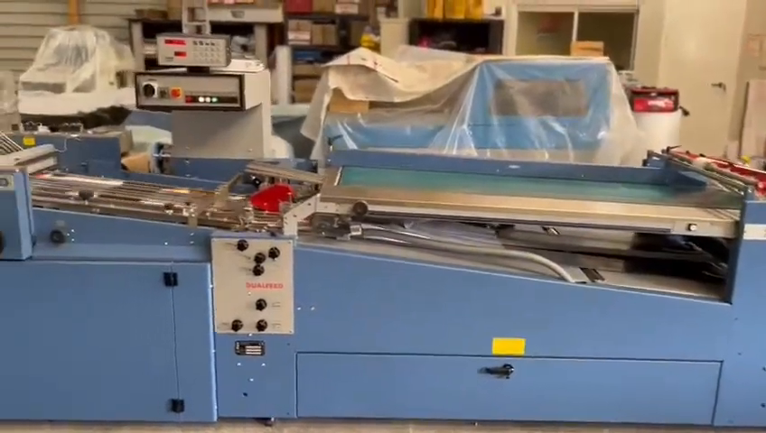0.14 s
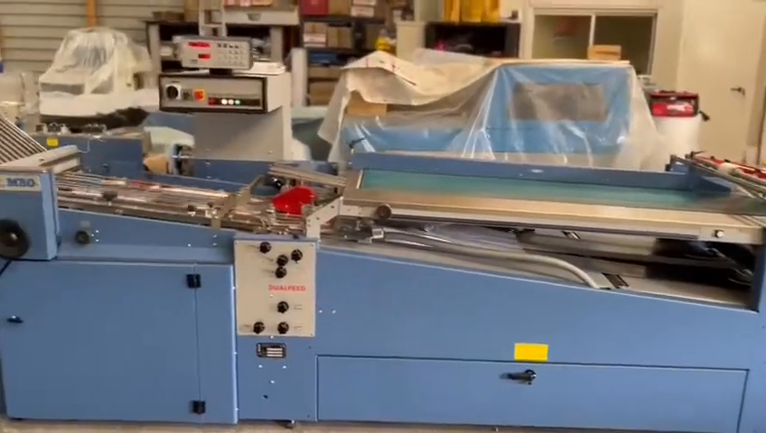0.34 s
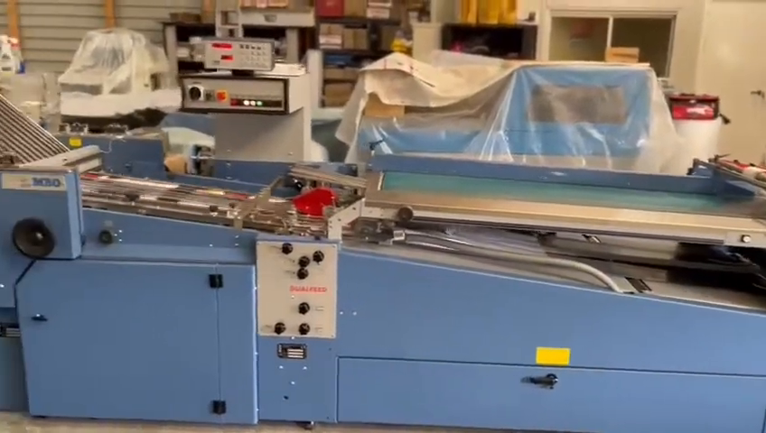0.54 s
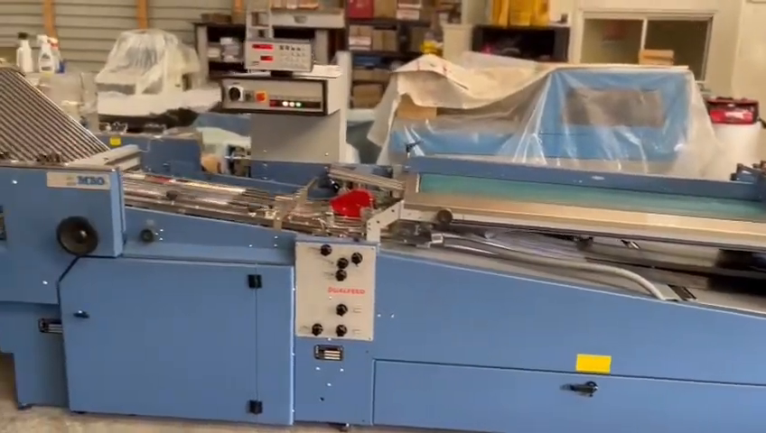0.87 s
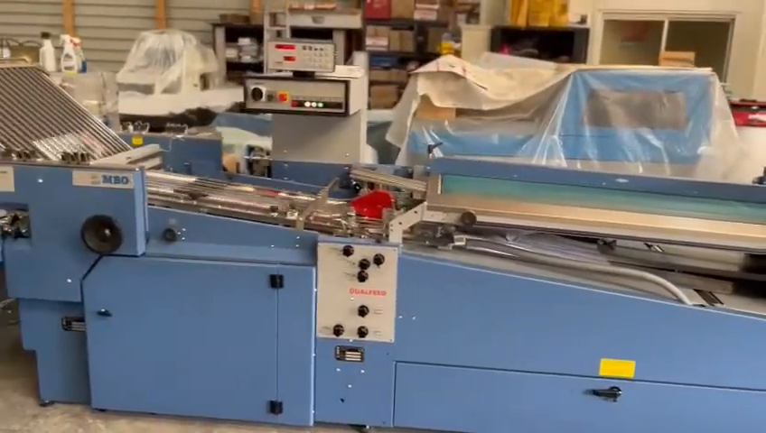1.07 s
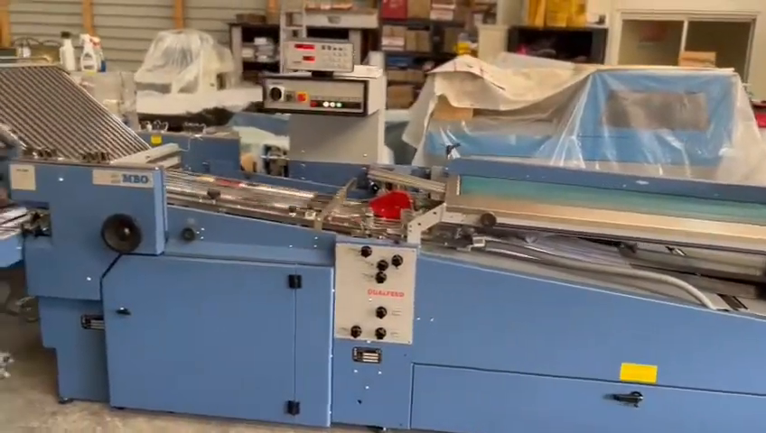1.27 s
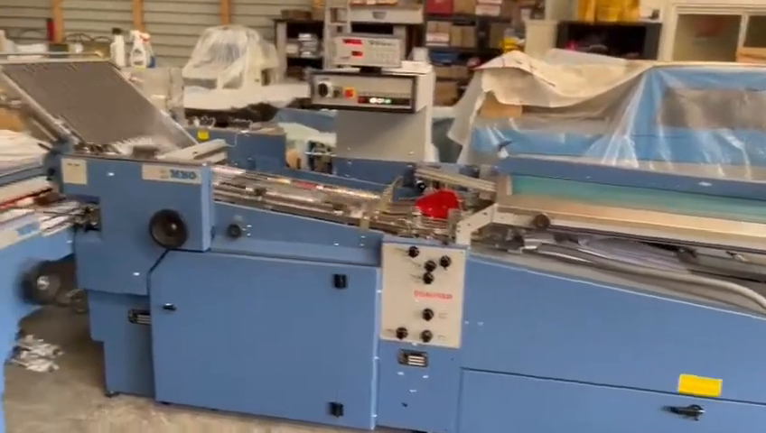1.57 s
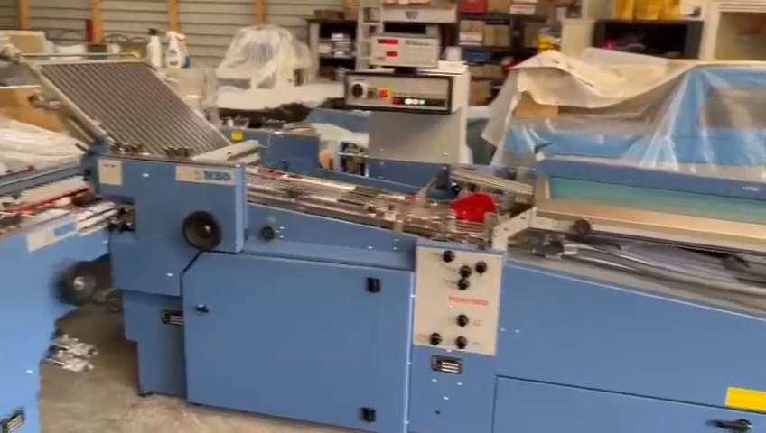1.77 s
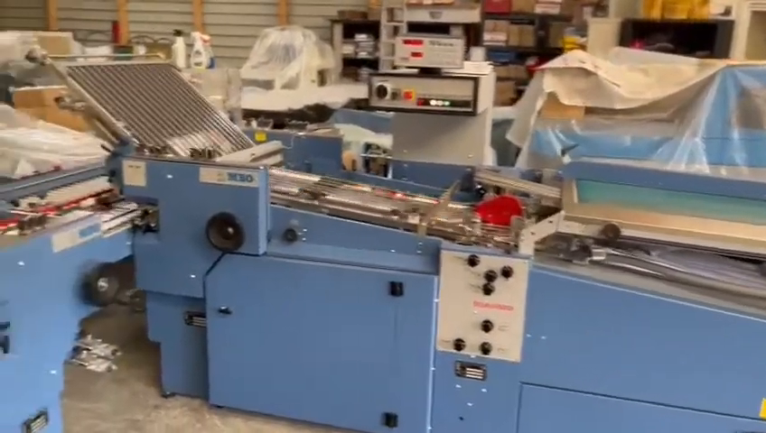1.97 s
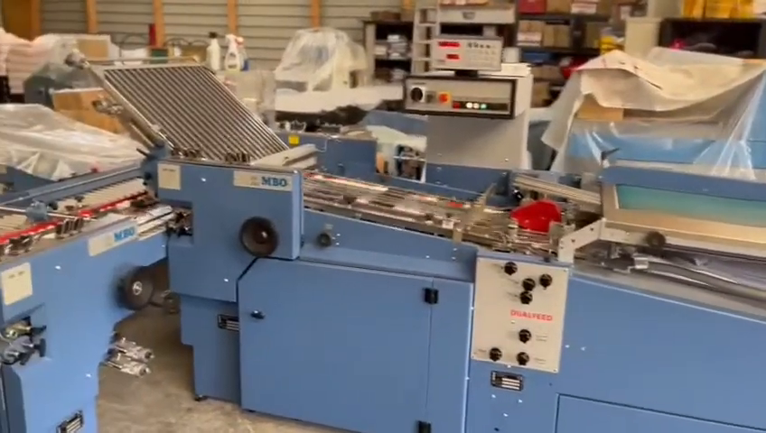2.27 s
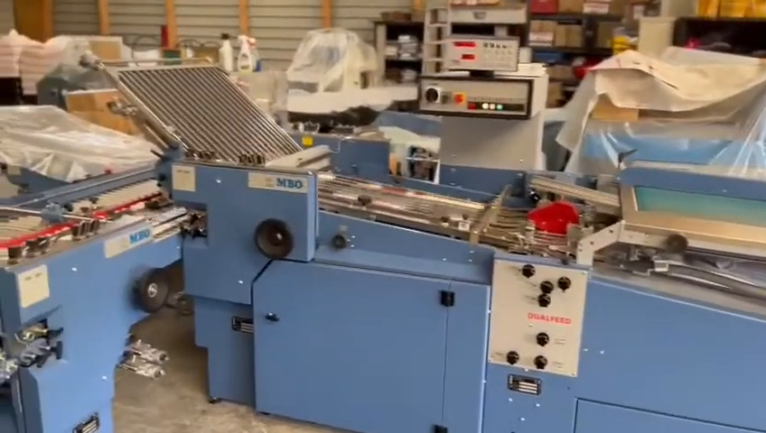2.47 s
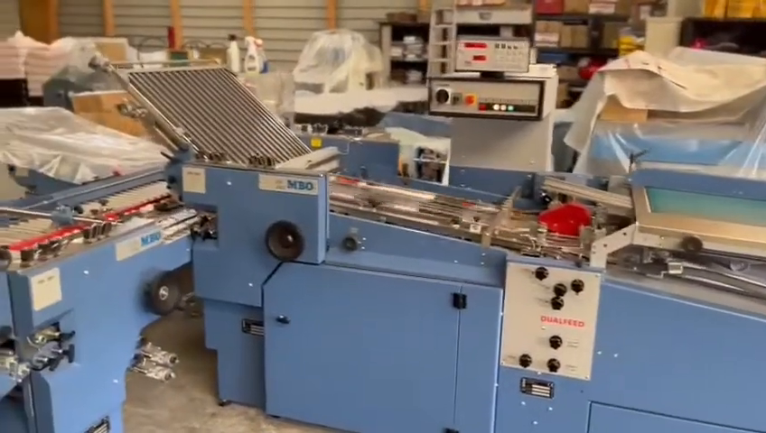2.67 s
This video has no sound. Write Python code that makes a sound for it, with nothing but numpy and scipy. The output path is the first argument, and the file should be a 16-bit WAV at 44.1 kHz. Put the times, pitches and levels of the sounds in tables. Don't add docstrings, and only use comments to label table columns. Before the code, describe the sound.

A paper folding machine runs continuously in an echoing workshop, a few metres from a phone; roughly every 0.43 seconds a sheet rattles through and snaps against stops, over roller drone, belt chatter and air hiss.

```python
import sys
import numpy as np
from scipy import signal
from scipy.fft import rfft, irfft
from scipy.io import wavfile
from scipy.ndimage import uniform_filter1d

SR = 44100
rng = np.random.default_rng(int(sys.argv[2]) if len(sys.argv) > 2 else 0)


def wav_out(sig):
    wavfile.write(sys.argv[1], SR, np.round(np.clip(np.atleast_2d(sig).T, -1, 1) * 32767).astype(np.int16))


def voltage_ratio(decibels):
    exponent = np.asarray(decibels, float) / 20
    return 10 ** exponent


N = 123921
TIME = np.arange(N) / SR
ROOM_T60_S, ROOM_DB = 0.51, -3.5


def level(x, db):
    return x * voltage_ratio(db) / np.sqrt(np.mean(x ** 2))


def colour(x, curve):
    hz, db = np.array(curve).T
    f = np.fft.rfftfreq(N, 1 / SR) + 1
    gain = voltage_ratio(np.interp(np.log(f), np.log(hz), db))
    return irfft(rfft(x) * gain, N)


def ring(x, hz, width_hz):
    return signal.lfilter(*signal.iirpeak(hz, hz / width_hz, fs=SR), x)


def walk(rate):
    k = int(SR / rate)
    steps = np.repeat(rng.standard_normal(N // k + 1), k)
    smooth = uniform_filter1d(uniform_filter1d(steps, k), k)
    return 1.327 * smooth[:N]


def clicks(rate, spread_db):
    loudness = voltage_ratio(spread_db * np.minimum(rng.exponential(size=N), 3))
    size = (rng.random(N) < rate / SR) * loudness
    return level(size * rng.standard_normal((2, N)), 0)


def burst(start, rise, hold, fall, sag_db):
    u = TIME - start
    held = voltage_ratio(sag_db * np.clip(u, 0, hold))
    return np.clip(u / rise, 0, 1) * held * np.exp(-np.maximum(u - hold, 0) / fall)


def room(gate):
    pole = 10 ** (-6 / (ROOM_T60_S * SR))
    power = signal.lfilter([1 - pole], [1, -pole], gate ** 2)
    return voltage_ratio(ROOM_DB) * np.sqrt(power) * rng.standard_normal((2, N))


# [start t/s, length t/s, level/dB]
SHEET_TIMES = [(-.18, 0.16, -19.5), (0.237, 0.077, -20.5), (0.357, 0.025, -27.5), (0.69, 0.11, -20),
               (1.102, 0.16, -22), (1.272, 0.025, -36), (1.554, 0.094, -20), (1.705, .03, -31),
               (1.973, 0.13, -21.5), (2.12, 0.034, -26), (2.397, 0.16, -22)]
# [f/Hz, level/dB per Hz]
RATTLE_TONE = [(150, -7), (300, 2.5), (600, 3), (1000, 5.5), (2400, 3), (4200, -3), (5500, -12.5),
               (7500, -48)]


def sheets():
    rise_s, sag_db_per_s, fall_s = 0.047, -35, 0.056
    gate = sum(voltage_ratio(db) * burst(s, rise_s, length, fall_s, sag_db_per_s) for s, length, db in SHEET_TIMES)
    gate = gate * voltage_ratio(1.6 * walk(70))
    rattle = clicks(8000, spread_db=3.0) * gate
    return level(colour(rattle + room(gate), RATTLE_TONE), -25)


# [t/s, level/dB, pan level/dB, f/Hz]
EDGE_SNAPS = [(.249, -19, 1.5, 5400), (.280, -8, 2, 2500), (0.299, -18, 2, 1500), (.322, -13, 2, 4000),
              (.381, -13.5, 4, 4350), (0.695, -18, 2, 5430), (.717, -10.5, 6, 3520), (.762, -13, 3, 2200),
              (.785, -9, 1, 2000), (0.825, -18, 4, 5040), (1.107, -16, -2, 5000), (1.135, -13, 1, 4570),
              (1.171, -4.5, 2, 2200), (1.195, -6.5, 4, 1800), (1.283, -16, 4, 4000), (1.569, -16, -1, 3600),
              (1.594, -9, -3, 3000), (1.62, -9, 2, 1800), (1.708, -17, 5, 4000), (1.986, -21, 2.5, 4500),
              (2.016, -11, 2.5, 3460), (2.041, -14, 10, 2200), (2.138, -9, 3, 1400), (2.167, -12, 12, 3460),
              (2.198, -25, 2.5, 2540), (2.418, -17, 10, 4400), (2.443, -10, 10, 2800),
              (2.52, -11, 2.5, 1800), (2.58, -24, 9, 3000), (.256, -13, -1, 890), (0.326, -17, 2, 2200),
              (0.401, -19, 4, 1800), (0.444, -16, 3, 1120), (.565, -17, -4, 3000), (.591, -18, -2, 1400),
              (0.751, -14, 2, 1500), (1.158, -12, 1.5, 1500), (1.227, -11, 2, 1500), (1.257, -12, 2, 2200),
              (1.484, -18.5, -1, 4500), (1.558, -8, -2, 1300), (1.652, -4, 2, 1100), (1.672, -8.5, 4, 2500),
              (2.075, -18, 2, 1800), (2.107, -15, 2, 1500), (2.469, -3.5, -1, 1800)]


def snaps():
    gain_db, echo_db, snap_t60_s = 1.5, -16.5, 0.066
    out = np.zeros((2, N + SR))
    u = np.arange(SR // 5) / SR
    crack_fade = voltage_ratio(-60 * u / snap_t60_s) * np.clip(u / 0.004, 0, 1)
    echo_fade = voltage_ratio(echo_db - 60 * u / ROOM_T60_S) * np.clip(u / 0.011, 0, 1)
    for s, db, pan_db, hz in EDGE_SNAPS:
        direct, echo_mid, echo_side = ring(rng.standard_normal((3, len(u))), hz, 0.45 * hz)
        pan = np.array([[1], [np.tanh(pan_db / 17)]])
        snap = direct * crack_fade * pan + np.array([echo_mid, echo_side]) * echo_fade
        first = int(s * SR)
        out[:, first:first + len(u)] += voltage_ratio(db + gain_db) * snap
    return out[:, :N]


def panel(hz, width_hz, db):
    noise = rng.standard_normal((2, 2, N))
    a, b = signal.lfilter([1], [1, -np.exp(-np.pi * width_hz / SR)], noise)
    turn = 2 * np.pi * np.cumsum(hz * (1 + 0.018 * walk(7))) / SR
    return level(a * np.cos(turn) + b * np.sin(turn), db) * voltage_ratio(1.2 * walk(11))


# [f/Hz, level/dB per Hz]
DRONE_TONE = [(32, -45), (55, 2), (100, 2), (300, -1), (600, -4), (1500, -3.5), (3800, -14), (7000, -25.5)]
# [f/Hz, width f/Hz, level/dB]
FRAME_PANELS = [(75.9, 8.8, -42.5), (94.4, 4.6, -43.5), (121.7, 10, -41), (229.6, 25.5, -39.5),
                (331.5, 23, -42), (555.5, 28, -43), (814, 32, -33.5), (844, 89, -37), (945.5, 110, -43),
                (1002, 33, -39), (1354, 86, -37.5), (3624, 160, -42.5), (2014, 140, -47.5), (155, 11, -44),
                (442.8, 38, -43.5)]


def drone():
    roller_hz, roller_db = 35.18, 3
    speed = roller_hz * (1 + 0.046 * walk(4.945))
    turn = np.sin(2 * np.pi * np.cumsum(speed) / SR)
    clatter = clicks(9000, spread_db=3.0) * voltage_ratio(roller_db * turn + 0.3 * walk(15))
    clatter = clatter + 1.06 * rng.standard_normal((2, N))
    frame = sum(panel(hz, width_hz, db) for hz, width_hz, db in FRAME_PANELS)
    return level(colour(clatter, DRONE_TONE), -28) + frame


# [t/s, level/dB]
BELT_LEVELS = [
    (0, -32),
    (.5, -33.5),
    (1, -32.5),
    (1.5, -34.5),
    (2, -37),
    (2.401, -43),
    (2.81, -42),
]
# [f/Hz, level/dB per Hz]
BELT_TONE = [(500, -10), (1200, 1.5), (2500, -1.5), (3600, 0.5), (5500, -10), (7200, -23), (8000, -31)]


def belts():
    s, db = np.array(BELT_LEVELS).T
    loudness_db = np.interp(TIME, s, db) + 0.86 * walk(13.3)
    return level(colour(clicks(7000, spread_db=2.5), BELT_TONE), 0) * voltage_ratio(loudness_db)


# [start t/s, length t/s, level/dB]
AIR_PUFFS = [(-.2, .12, -42), (0.197, .12, -40), (.58, 0.053, -44), (.66, 0.17, -47.5), (1.04, 0.15, -40.5),
             (1.51, .13, -43.5), (1.89, 0.044, -41), (1.956, .12, -43), (2.333, 0.039, -37),
             (2.38, .17, -45), (2.756, .1, -50)]
# [f/Hz, level/dB]
AIR_TONE = [(3000, -8), (6000, 3.5), (8000, 0.5), (10000, -1.5), (11500, 5)]
# [f/Hz, level/dB]
AIR_SIDE = [(4000, -22), (6100, -1), (8000, 6), (10000, 6.5)]


def air():
    rise_s, swell_db_per_s, fall_s = 0.038, 2, 0.025
    gate = voltage_ratio(-41)
    for s, length, db in AIR_PUFFS:
        gate = gate + voltage_ratio(db) * burst(s, rise_s, length, fall_s, swell_db_per_s)
    jets = np.zeros((2, N))
    for hz in range(4000, 12400, 300):
        jet = ring(ring(rng.standard_normal((2, N)), hz, 390), hz, 390)
        jets += jet * voltage_ratio(3 * walk(21.83))
    hiss = level(colour(jets, AIR_TONE), 0) * gate * voltage_ratio(1.2 * walk(30.04))
    hiss[1] = colour(hiss[1], AIR_SIDE)
    return hiss


# [f/Hz, level/dB]
INVERTER_TONES = [(11326, -58), (10994, -64), (10655, -66), (9976, -68)]


def whine():
    return sum(voltage_ratio(db + 1.5 * walk(6.5)) * np.sin(2 * np.pi * hz * TIME) for hz, db in INVERTER_TONES)


# [t/s, level/dB]
AIR_TICKS = [
    (.18, -52),
    (.222, -52),
    (1.058, -54),
    (2.338, -48),
]


def ticks():
    gate = sum(voltage_ratio(db) * np.exp(-((TIME - s) / .012) ** 2) for s, db in AIR_TICKS)
    hiss = ring(ring(rng.standard_normal(N), 8500, 1600), 8500, 1600)
    return level(hiss, 0) * gate


def thin(x):
    f, _, z = signal.stft(x, SR, nperseg=1024)
    power = uniform_filter1d(uniform_filter1d(np.abs(z) ** 2, size=2, axis=-2), size=3, axis=-1)
    local = uniform_filter1d(uniform_filter1d(power, size=15, axis=-2), size=3, axis=-1)
    bar_db = np.interp(f, [2000, 5600], [-16.5, -1.5])[:, None]
    kept = z * (power > local * voltage_ratio(bar_db) ** 2)
    return signal.istft(kept, SR, nperseg=1024)[1][..., :N]


# [f/Hz, level/dB]
PORT_SIDE = [(60, -48), (300, -19), (700, -7), (1150, -4.5), (1600, 4), (1720, -6.5), (3000, -2.5),
             (6000, -6.5)]
# [f/Hz, level/dB]
LEFT_LEAN = [(100, -40), (700, -18), (1300, -17), (3800, -10.5), (6500, -18), (9000, -20), (10500, -11)]


def scene():
    mid, side = drone() + belts() + sheets()
    crack, hiss = snaps(), air()
    mid = mid + crack[0] + hiss[0] + whine()
    side = colour(side, PORT_SIDE) + crack[1] + hiss[1]
    null = signal.cheby2(3, 11, [7400, 9500], "bandstop", fs=SR, output="sos")
    mid = signal.sosfiltfilt(null, mid) + ticks()
    side_top = signal.butter(8, 10200, fs=SR, output="sos")
    side = signal.sosfiltfilt(side_top, side + colour(mid, LEFT_LEAN))
    left_right = np.array([[1, 0.83], [1, -0.995]]) @ thin(np.array([mid, side]))
    return signal.sosfiltfilt(signal.butter(16, 11550, fs=SR, output="sos"), left_right)


def top_cut(x):
    return signal.sosfilt(signal.butter(12, 12030, fs=SR, output="sos"), x)


def record(dry):
    ceiling, gap_s, gap_len_s, gap_db = .75, .1903, .0222, -25
    gap_end_s = gap_s + gap_len_s
    edges_s = [gap_s - .0007, gap_s, gap_end_s, gap_end_s + 0.00034]
    gap = np.interp(TIME, edges_s, [0, gap_db, gap_db, 0])
    return top_cut(ceiling * np.tanh(dry / ceiling) * voltage_ratio(gap))


dry = scene()
out = record(dry)
wav_out(out)
```